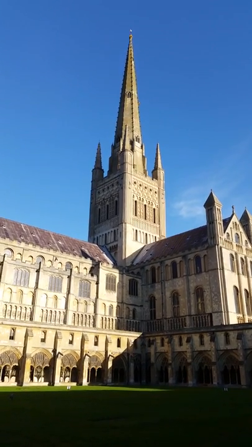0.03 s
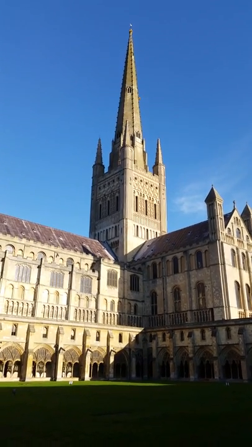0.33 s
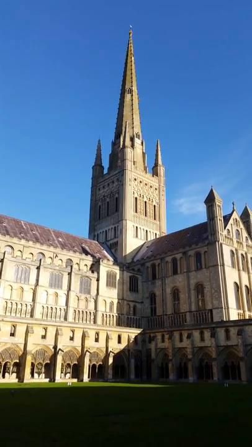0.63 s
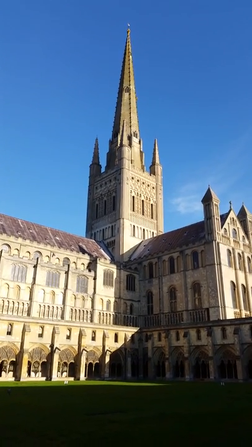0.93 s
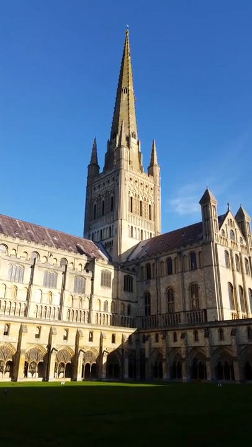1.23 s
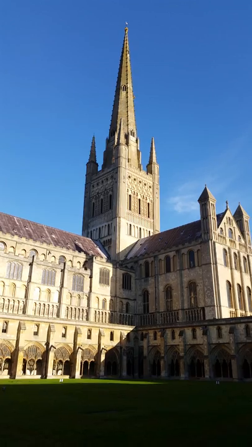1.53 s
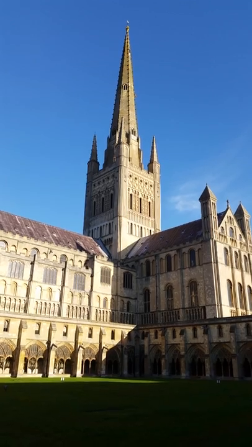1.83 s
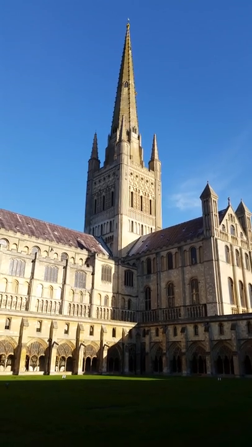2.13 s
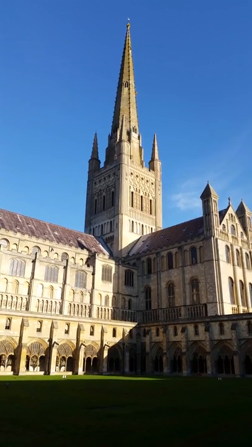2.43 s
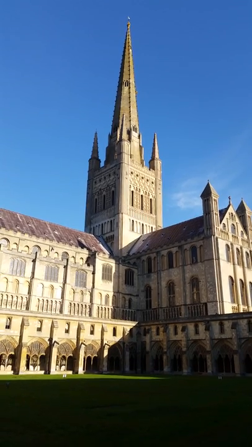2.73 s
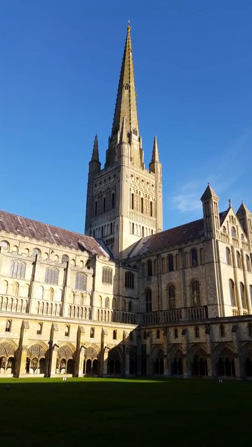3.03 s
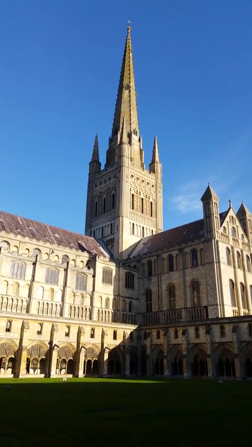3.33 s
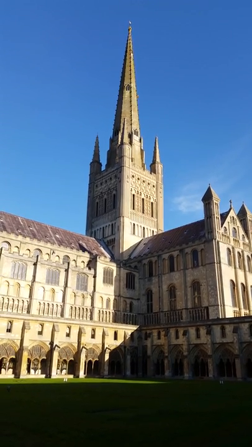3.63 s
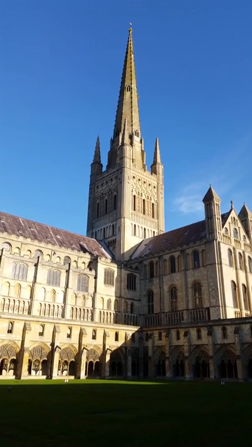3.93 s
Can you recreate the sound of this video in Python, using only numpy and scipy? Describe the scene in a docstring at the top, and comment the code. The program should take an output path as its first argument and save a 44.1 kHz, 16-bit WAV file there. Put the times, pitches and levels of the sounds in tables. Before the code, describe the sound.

A big tower bell, heard from a distance in a stone courtyard, first lingers as a soft, low hum over far traffic rumble and light hiss. Then one clanging stroke swells with echoes and keeps ringing.

```python
"""On a cloister lawn, a large bell is heard, struck once high in a stone tower.
The clapper's blow makes a clang and sets many tones ringing. They swell as the walls throw them
back, then fade. Low tones from earlier strokes still linger in the air.
Behind it all lie the rumble of traffic in a distant town and a thin, steady hiss."""
import sys
import numpy as np
from scipy import signal
from scipy.fft import rfft, irfft
from scipy.io import wavfile

SR = 44100
rng = np.random.default_rng(int(sys.argv[2]) if len(sys.argv) > 2 else 0)


def inscribe(sig):
    """Save sig as 16-bit PCM at rate SR to the path in sys.argv[1].

    A 1-D sig is mono; a 2-D sig holds one channel per row.
    Samples are clipped to [-1, 1] before scaling.
    """
    pcm = np.round(np.clip(np.atleast_2d(sig).T, -1, 1) * 32767)
    wavfile.write(sys.argv[1], SR, pcm.astype(np.int16))


N = 176400
TIME = np.arange(N) / SR
BINS_HZ = np.maximum(np.arange(N // 2 + 1) * SR / N, 1)
SIDES = np.array([[1], [-1]])   # left ear, right ear

# Below, pan is how much louder the left ear is, and a fade time is how long a 60 dB drop takes.
# Likeness is how alike the two ears are, from 0 (unrelated) to 1 (the same).

# Tone colour of the even hiss: pitch_hz, relative_level_db
HISS_COLOUR = [(2000, -8), (4600, -5), (5600, -6), (7400, -20), (9200, -21), (10300, -17), (12200, -6),
               (14000, -3.5), (15300, 0)]
# Tone colour of a narrow, sizzling band of hiss: pitch_hz, relative_level_db
SIZZLE_COLOUR = [(2400, -48.5), (2850, -23), (3200, -6.5), (3520, 1.5), (3850, -8.5), (4250, -18.5),
                 (4700, -39), (5600, -70.5)]
# Tone colour of the distant traffic: pitch_hz, relative_level_db
TOWN_COLOUR = [(10, -32), (22, -18.5), (36, -0.5), (55, 1), (82, -3.5), (115, 1.5), (165, -1), (235, -4.5),
               (320, -7), (430, -14.5), (550, -15), (740, -13), (1000, -19), (1300, -23), (1800, -33.5),
               (2600, -42), (5000, -65), (9000, -86.5)]
# How alike the traffic sounds in both ears: pitch_hz, likeness
TOWN_LIKENESS = [(30, 0.98), (120, 0.97), (250, 0.9), (500, 0.58), (900, 0.28), (2000, 0.027)]
# Which side the traffic leans to: pitch_hz, pan_db
TOWN_PAN = [(50, -0.5), (150, 0), (300, 3), (700, 1), (1500, 2.5), (4000, -5.5)]
# Low tones still ringing from earlier strokes: pitch_hz, level_db, pan_db, fade_s, beat_hz, beat_depth
LINGERING_TONES = [(195.4, -53.5, 3, 45, 1.0, .5), (292.8, -55.5, 3, 28, 1.2, .25),
                   (364.3, -55, 4, 14, 1.0, .4), (393, -65, 6, 28, 1.4, .4), (456.4, -60, 8, 22, .8, .15),
                   (520, -62, 8, 12, .7, .15)]
# Tone colour of the clapper's clang, smeared by the walls: pitch_hz, relative_level_db
CLANG_COLOUR = [(150, -16), (310, 2), (600, -1), (1000, 0), (1300, -4), (2000, -10), (2700, -14),
                (3500, -16), (4500, -24), (5600, -31), (6400, -40), (7200, -55), (8500, -75)]
# The bell's ringing tones and their wall echoes:
# pitch_hz, level_db, pan_db, fade_s, echo_share, echo_delay_s
BELL_TONES = [(363.7, -42.0, 8.0, 14.0, 0.45, 0.135), (455.9, -40.7, 6.0, 6.2, 0.29, 0.164),
              (574.7, -44.1, 1.0, 3.1, 0.74, 0.058), (738.2, -26.8, 1.0, 5.2, 0.77, 0.099),
              (961.3, -34.8, -5.0, 3.1, 0.68, 0.049), (968.0, -44.0, 2.0, 2.5, 0.5, 0.06),
              (984.0, -36.8, 4.0, 1.3, 0.48, 0.154), (996.2, -38.9, 2.0, 2.1, 0.54, 0.22),
              (1087.4, -32.0, 2.0, 1.8, 0.71, 0.14), (1229.4, -41.3, -3.0, 6.1, 0.39, 0.123),
              (1482.8, -39.3, 2.0, 12.0, 0.12, 0.1), (1529.0, -50.3, 3.0, 3.5, 0.4, 0.08),
              (1539.6, -44.0, 5.0, 2.6, 0.46, 0.109), (1555.8, -38.8, 9.0, 2.6, 0.69, 0.051),
              (1665.5, -46.0, 3.0, 2.9, 0.77, 0.066), (1762.7, -48.2, -5.0, 2.8, 0.35, 0.145),
              (1794.3, -48.0, 2.0, 1.9, 0.58, 0.161), (1809.5, -58.3, 0.0, 2.0, 0.4, 0.08),
              (1931.9, -37.3, -1.0, 1.8, 0.55, 0.02), (1957.8, -53.3, 0.0, 1.6, 0.4, 0.04),
              (2034.9, -48.6, -1.0, 2.2, 0.61, 0.018), (2117.7, -41.7, -6.0, 1.3, 0.69, 0.073),
              (2206.8, -50.4, -2.0, 4.1, 0.49, 0.089), (2230.7, -53.6, 4.0, 4.0, 0.14, 0.11),
              (2403.6, -36.3, -1.0, 2.2, 0.5, 0.15), (2440.0, -60.3, 4.0, 2.5, 0.6, 0.04),
              (2602.8, -50.1, -2.0, 1.3, 0.64, 0.065), (2647.9, -45.5, 1.0, 1.9, 0.67, 0.227),
              (2755.9, -53.9, -3.0, 2.3, 0.45, 0.25), (2823.2, -47.3, -4.0, 1.0, 0.86, 0.116),
              (2915.7, -40.5, -11.0, 2.4, 0.88, 0.045), (2963.5, -55.8, -2.0, 1.5, 0.51, 0.022),
              (3214.2, -52.5, 0.0, 1.7, 0.76, 0.045), (3302.0, -57.8, -2.0, 2.3, 0.64, 0.03),
              (3450.4, -43.9, 0.0, 1.2, 0.59, 0.08), (3674.8, -60.9, 8.0, 2.4, 0.62, 0.04),
              (3981.0, -58.5, 0.0, 1.8, 0.3, 0.05), (3994.1, -49.0, 7.0, 1.6, 0.4, 0.17),
              (4546.9, -56.4, -5.0, 1.2, 0.61, 0.069), (5118.2, -59.5, -12.0, 1.2, 0.7, 0.07),
              (5686.8, -70.0, -6.0, 0.8, 0.82, 0.055), (6177.3, -78.4, -12.0, 0.8, 0.72, 0.048),
              (6262.1, -74.4, -9.0, 0.8, 0.87, 0.06)]
# How far ahead the bell's wave is at the left ear: pitch_hz, lead_radians
LEFT_EAR_LEAD = [(400, -0.7), (575, 0.5), (740, .5), (970, -1.67), (1090, -2), (1230, -2.5), (1670, -2),
                 (1930, -1.76), (2100, -2.2), (2400, -0.74), (2800, 2.2), (2920, 1.3), (4000, 2)]

STRIKE_S = 3.527


def from_db(db):
    """Turn decibels into a number to multiply a sound by."""
    return 10 ** (np.asarray(db) / 20)


def at_hz(table, hz):
    """Read a table at any pitch, sliding between its rows on a musical scale."""
    rows = np.array(table)
    return np.interp(np.log(hz), np.log(rows[:, 0]), rows[:, 1])


def pan(db):
    """Share a sound between left and right while keeping its total power."""
    gains = from_db(SIDES * db / 2)
    return gains / np.sqrt(np.mean(gains ** 2, axis=0))


def fade(age, fade_s):
    """Die away by 60 dB every fade_s seconds."""
    return np.exp(-np.log(1000) * np.maximum(age, 0) / fade_s)


def rise(age, rise_s):
    """Climb from 0 to 1 in rise_s seconds."""
    return np.clip(age / rise_s, 0, 1)


def noise(colour, likeness):
    """Stereo noise of strength 1, with a given tone colour and likeness between the ears."""
    shared, opposite = rfft(rng.standard_normal((2, N)))
    ears = np.sqrt(1 + likeness) * shared + np.sqrt(1 - likeness) * opposite * SIDES
    sound = irfft(from_db(at_hz(colour, BINS_HZ)) * ears, N)
    return sound / sound.std()


def drift(rate_hz):
    """A slow random wander around 0, typically about 1 in size."""
    wander = irfft(rfft(rng.standard_normal(N)) / (1 + (BINS_HZ / rate_hz) ** 2), N)
    return (wander - wander.mean()) / wander.std()


def hiss():
    """Thin, even microphone hiss, with a narrow sizzling band mostly on the left."""
    even = from_db(-71) * pan(db=0.5) * noise(HISS_COLOUR, likeness=0.02)
    sizzle = from_db(-57) * pan(db=15) * noise(SIZZLE_COLOUR, likeness=0.02)
    return even + sizzle


def distant_town():
    """Far traffic blends into a smooth roar whose deepest rumble slowly grows."""
    rumble_hz, growth_db_per_s = 60, 1.0
    level_db, waver_db = -42, 0.38
    traffic = noise(TOWN_COLOUR, at_hz(TOWN_LIKENESS, BINS_HZ))
    spectrum = rfft(traffic) * pan(at_hz(TOWN_PAN, BINS_HZ))
    deep_share = 1 / (1 + (BINS_HZ / rumble_hz) ** 4)
    rumble = irfft(spectrum * deep_share, N)
    roar = irfft(spectrum * (1 - deep_share), N)
    growth = from_db(growth_db_per_s * (TIME - TIME.mean()))
    level = from_db(level_db - waver_db * drift(rate_hz=7.5))
    return level * (roar + growth * rumble)


def lingering_hum():
    """The bell still hums from earlier strokes: pairs of close, low tones that slowly throb (beat)."""
    out = np.zeros((2, N))
    for hz, level_db, pan_db, fade_s, beat_hz, beat_depth in LINGERING_TONES:
        phase, partner_phase = 2 * np.pi * rng.random(2)
        tone = np.sin(2 * np.pi * hz * TIME + phase)
        partner = beat_depth * np.sin(2 * np.pi * (hz + beat_hz) * TIME + partner_phase)
        out += np.sqrt(2) * from_db(level_db) * pan(pan_db) * fade(TIME, fade_s) * (tone + partner)
    return out


def clapper_clang():
    """The blow wakes many weak, short-lived tones; the courtyard blurs part of them into a wash."""
    tones_per_hz, tone_share, treble_hz = 0.03, 0.4, 3200
    age = TIME - STRIKE_S
    wash = noise(CLANG_COLOUR, likeness=0.17)
    # A few pitches picked at random from the noise ring as tones.
    picked = rng.random(len(BINS_HZ)) < tones_per_hz * SR / N
    tones = irfft(rfft(wash) * picked, N)
    clang = np.sqrt(tone_share) * tones / tones.std() + np.sqrt(1 - tone_share) * wash
    body = irfft(rfft(clang) / (1 + (BINS_HZ / treble_hz) ** 4), N)
    treble = clang - body
    dying = body * fade(age, fade_s=2.0) + treble * fade(age, fade_s=1.5)
    return from_db(-37.3) * rise(age, rise_s=0.042) * dying


def scattered_echoes(age, hz):
    """Many weak echoes add up at each ear and make a tone waver, high tones most of all."""
    db_at_1khz, db_per_octave, memory_s = -11.5, 2, 0.016
    # Complex numbers give each echo its own strength and its own place in the wave (phase).
    real, imag = rng.standard_normal((2, 2, len(age)))
    echoes = (real + 1j * imag) * fade(age, fade_s=3)
    # Smooth them twice over, making up for the strength that smoothing takes away.
    carry = np.exp(-1 / (memory_s * SR))
    make_up_gain = np.sqrt(2 * (1 - carry) ** 3)
    waver = signal.lfilter([make_up_gain], [1, -2 * carry, carry ** 2], echoes)
    return from_db(db_at_1khz + db_per_octave * np.log2(hz / 1000)) * waver


def bell():
    """Each tone of the struck bell arrives directly, swells with its wall echo, wavers and dies away."""
    out = np.zeros((2, N))
    ringing = TIME >= STRIKE_S
    age = TIME[ringing] - STRIKE_S
    for hz, level_db, pan_db, fade_s, echo_share, echo_delay_s in BELL_TONES:
        direct = (1 - echo_share) * rise(age, rise_s=0.029)
        wall_echo = echo_share * rise(age - echo_delay_s, rise_s=0.046)
        ear_shift = SIDES * at_hz(LEFT_EAR_LEAD, hz) / 2
        phase = 2 * np.pi * (hz * age + rng.random()) + ear_shift
        waver = 1 + scattered_echoes(age, hz)
        tone = (direct + wall_echo) * np.real(waver * np.exp(1j * phase))
        out[:, ringing] += np.sqrt(2) * from_db(level_db) * pan(pan_db) * fade(age, fade_s) * tone
    return out


def scene():
    """One stroke of the bell over the quiet of the cloister."""
    return bell() + clapper_clang() + lingering_hum() + distant_town() + hiss()


def record(dry):
    """Cut away the very highest treble steeply."""
    cutoff_hz = 15750
    low_pass = signal.ellip(N=12, rp=0.1, rs=80, Wn=cutoff_hz, fs=SR, output="sos")
    return signal.sosfilt(low_pass, dry)


dry = scene()
out = record(dry)
inscribe(out)
```